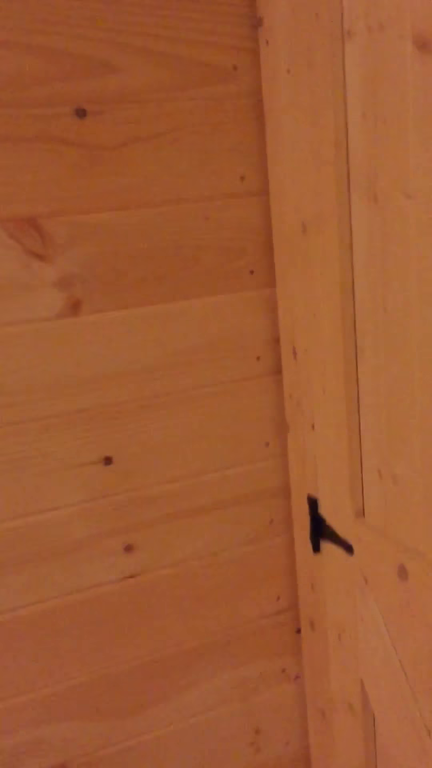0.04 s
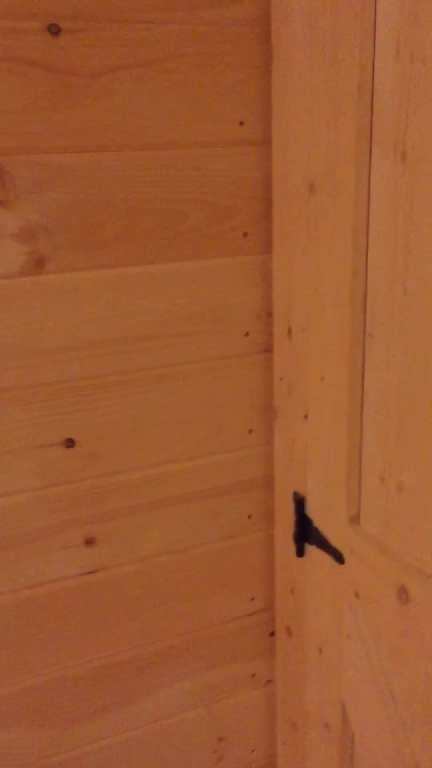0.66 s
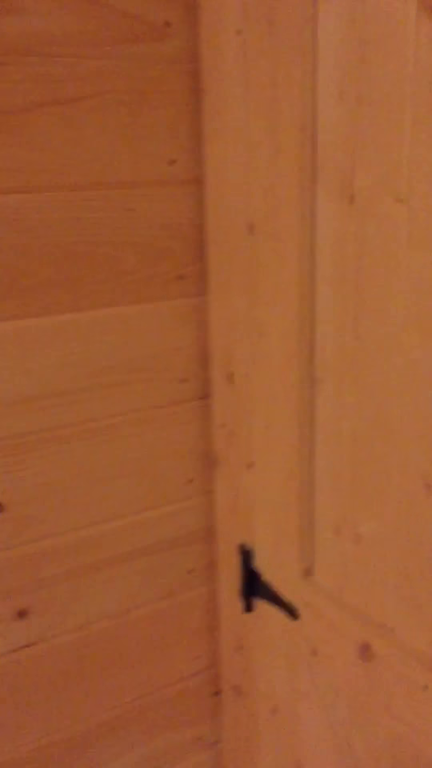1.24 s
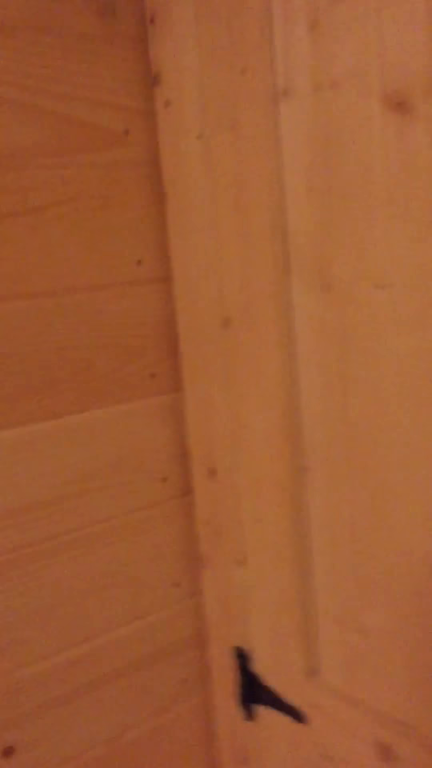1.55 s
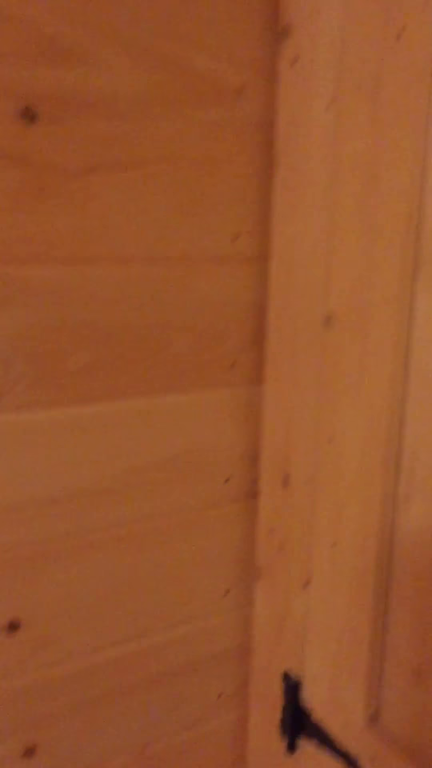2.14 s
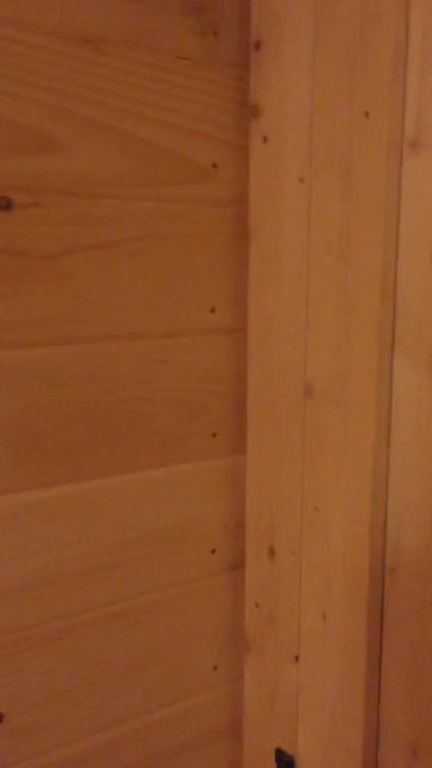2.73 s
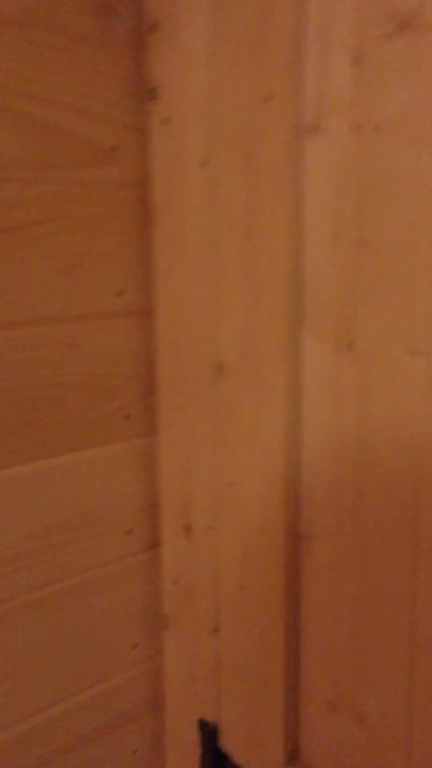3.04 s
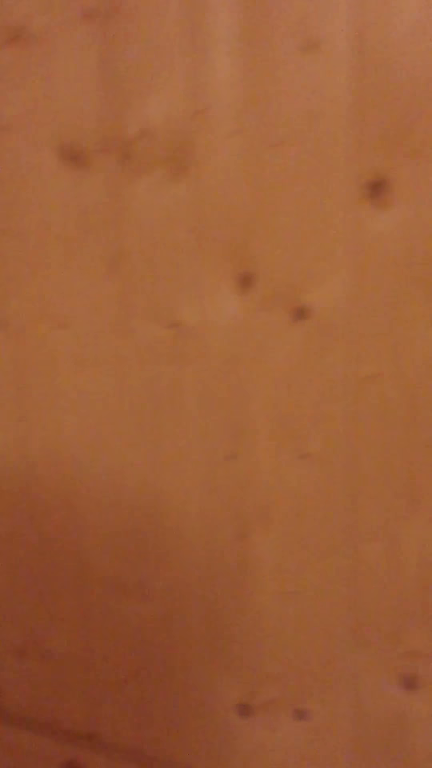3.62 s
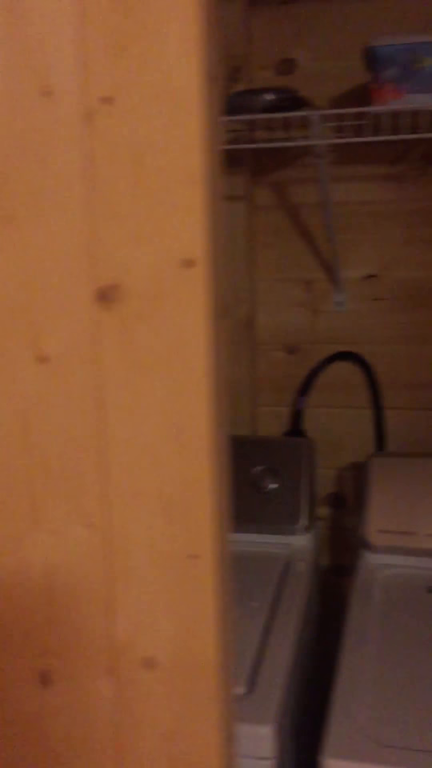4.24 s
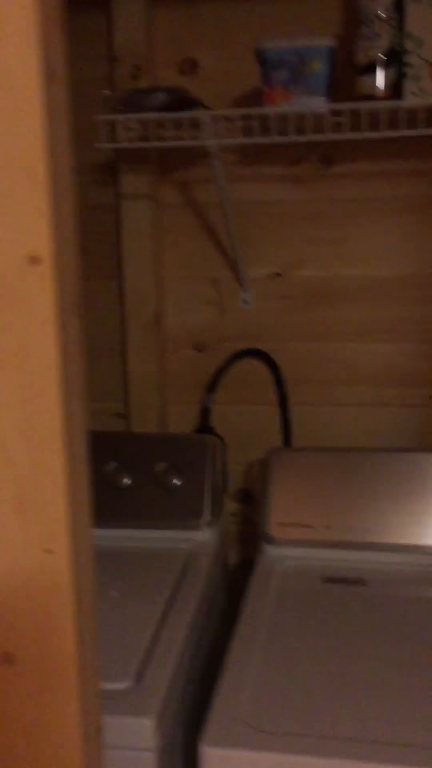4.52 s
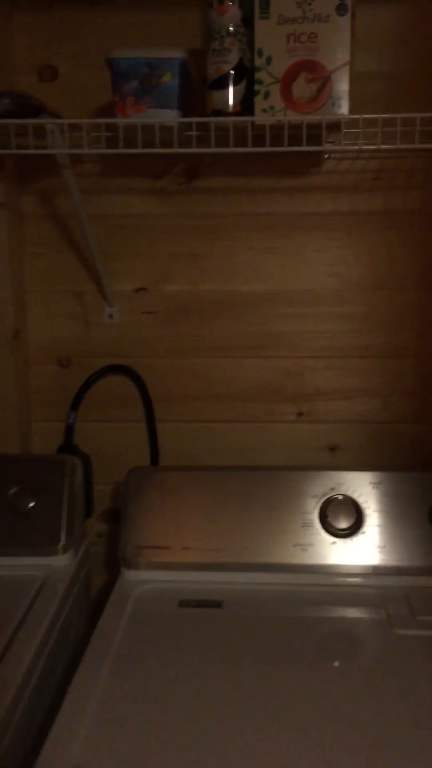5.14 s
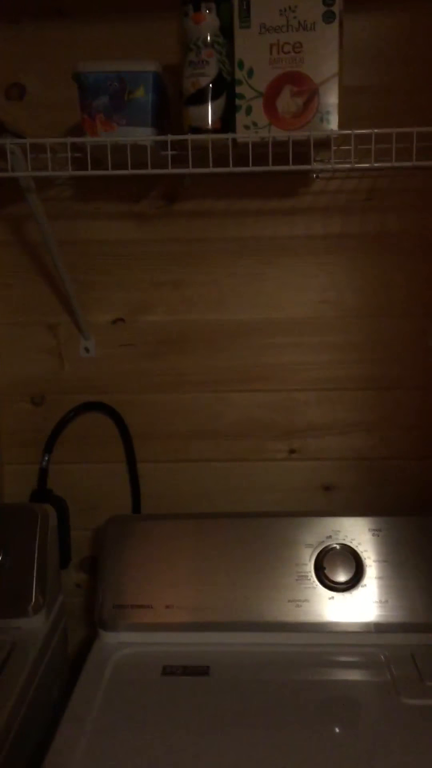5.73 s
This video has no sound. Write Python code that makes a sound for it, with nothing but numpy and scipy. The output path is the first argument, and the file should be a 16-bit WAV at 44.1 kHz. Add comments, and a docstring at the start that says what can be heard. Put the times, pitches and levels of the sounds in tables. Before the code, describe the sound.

A few soft bumps and a hand brushing boards lead into a run of uneven, hollow knocks as wooden closet doors stick and slip in their frame. Fittings click and a pivot squeaks faintly. One door breaks free with a sharp bang, and more booming knocks follow and fade. After a pause, the door comes to rest with a dull thud. It is heard close up in a small, quiet wooden cabin.

```python
"""A few soft bumps and a hand brushing the boards, then pine closet doors knock and boom as they are
pulled open in a small wooden cabin. The leaves stick and slip in their frame: each slip knocks the panel
and sets the closet booming, and one door breaks free with a sharp bang. Fittings tick, edges rub and a
pivot squeaks faintly, until the open door comes to rest with a dull thud over quiet room tone."""
import sys
import numpy as np
from scipy import signal
from scipy.fft import rfft, irfft, next_fast_len
from scipy.io import wavfile
from scipy.ndimage import map_coordinates

SR = 44100
rng = np.random.default_rng(int(sys.argv[2]) if len(sys.argv) > 2 else 0)


def int16_out(signal):
    """Quantize to a 16-bit WAV file."""
    q = np.round(np.clip(np.atleast_2d(signal).T, -1, 1) * 32767)
    wavfile.write(sys.argv[1], SR, q.astype(np.int16))


N = 254436
T = np.arange(SR) / SR  # seconds after a hit

# Door slips. Each row: start in seconds, strength in dB, boom in dB relative to the strength,
# crack in dB relative to the knock's mids.
SLIPS = [(0.9853, -30.5, -9, -14.5), (1.018, -33, -5.5, -36), (1.2613, -33, -3.5, -19.5),
         (1.4613, -24.5, -15, -10.5), (1.5626, -18.5, -8.5, -13.5), (1.6573, -25, -3, -9.5),
         (1.929, -27, -3, -8.5), (2.1815, -29.5, -2.5, -16), (2.709, -23, -1, -11.5),
         (2.9725, -23, -4.5, -9.5), (3.222, -25, -3.5, -9.5), (3.4311, -35, -7, -20),
         (3.6169, -28, -4, -17.5), (3.6511, -34.5, -5.5, -17), (3.8053, -31.5, -3, -14),
         (3.9597, -44, -5.5, -36)]
# The leaf swinging out of its frame. Each row: time in seconds, how free it is from 0 to 1.
SWING = [(3.1, 0), (3.65, 0.99)]
# The bang's three quick contacts. Each row: start in seconds, level in dB, treble shelf in dB.
BANG_HITS = [(2.5146, -14, -4), (2.518, -18.5, 8.5), (2.521, -20, -13)]
# The door meeting its stop. Each row: start in seconds, level in dB, puff in dB relative to the level.
STOP_HITS = [(5.2076, -32, -6.5), (5.226, -33.5, -4.5)]
# Soft, heavy bumps. Each row: start in seconds, level in dB, pitch the struck spot favours in Hz.
BUMPS = [(0.042, -51, 155), (0.057, -48.5, 111), (0.399, -56, 60), (0.902, -44.5, 116), (0.953, -44, 60),
         (1.584, -32.5, 162), (2.438, -41.5, 246), (2.483, -31.5, 160), (5.089, -53.5, 200),
         (5.378, -50.5, 115)]
# Fitting clicks. Each row: start in seconds, strength in dB, crack in dB relative to the mids.
TICKS = [(0.8657, -39, -10), (0.902, -46, 2), (0.948, -57, 12), (1.3948, -50, -15), (1.4147, -43, -15),
         (1.4486, -34, -23), (1.5416, -30.5, -8), (1.5472, -38.5, 5.5), (2.0575, -50.5, -4),
         (2.359, -31, -14.5)]
# Wood sliding on wood. Each row: start and length in seconds, opening and closing level in dB,
# low shelf in dB.
RUBS = [(0.946, 0.057, -49.5, -54.5, -10), (1.391, 0.07, -55.5, -49, -17.5), (1.489, 0.096, -57, -40, 5),
        (2.364, 0.115, -56, -53, 2.5), (2.474, 0.051, -46, -24, 4)]
# Pivot squeaks. Each row: start and length in seconds, pitch in Hz, level in dB.
SQUEAKS = [(1.112, 0.021, 1020, -63), (1.176, 0.11, 1100, -66.5), (1.753, 0.03, 870, -46),
           (3.512, 0.11, 1374, -61.5), (3.741, 0.018, 1100, -63.5)]
# Strokes of hand and sleeve. Each row: start and length in seconds, level in dB.
BRUSHES = [(0.328, 0.039, -55), (0.368, 0.054, -56), (0.428, 0.12, -70)]
RUSTLES = [(5.007, 0.085, -70.5), (5.377, 0.36, -71)]

# What rings after a hit. Each row: pitch in Hz, level in dB, time to fall 60 dB in seconds.
CLOSET_MODES = [(41.3, -0.5, .75), (57.68, 3, 0.74), (70.2, -4.5, 0.34), (80.7, 0, 0.9), (87.3, 0, 0.38),
                (114, -1.5, 0.36), (124, -7, 0.28), (133.35, -6, 0.53), (159.2, -5.5, 0.34),
                (187, -3, 0.22), (249, -6.5, 0.31), (315, -14.5, 0.39)]  # the low boom of door and closet
FITTING_MODES = [(676, 2, 1.2), (1359, -0.5, 0.9)]  # a metal fitting singing on faintly
FRAME_MODES = [(87, -0.5, 0.62), (124, -1, .35), (133, 3.5, 0.27), (240, -7.5, 0.39), (338, -6.5, 0.49),
               (660, -15, 0.12), (731, -11.5, 0.33), (814, -15, 0.25), (990, -15, .18), (1044, -16, 0.11),
               (1226, -4, 0.17), (1638, -15.5, 0.37), (2280, -9, 0.1), (2509, -8.5, 0.17),
               (2300, -6.5, 0.35), (2770, -9, .25), (3800, -12.5, .18), (6450, -16.5, .15)]  # the frame under the bang
STOP_MODES = [(61, -5, 0.53), (153.7, -1, 0.21), (177, -5.5, .22), (248.4, -5, 0.27), (281, 3.5, 0.091),
              (303, -12, 0.15), (423, -17, 0.26), (508, -34, 0.15), (536, -15.5, 0.19), (738, -20.5, 0.18),
              (1595, -22.5, 0.13)]  # the door against its stop
THUD_MODES = [(63, 0, 0.23), (118.97, -5, 0.095), (152.7, -5.5, 0.16), (168, -3, .16), (204, -9.5, 0.3),
              (245.5, -11.5, .22), (300, -6.5, .18), (493, -23.5, 0.18), (552, -19, 0.067),
              (1760, -29, .15)]  # woodwork under a soft bump

# Resonances of the door panel, its track and the brushed boards.
# Each row: centre in Hz, width in Hz, peak level in dB.
PANEL_PEAKS = [(394, 75, -2.5), (577.5, 26, 1), (708, 32, 0.5), (850, 39, 1), (1100, 50, 0.5),
               (1610, 78, -4), (2820, 28, 3), (3385, 20, 1.5), (3780, 43, -4), (4240, 30, -3),
               (4530, 160, 1.5), (5720, 31, -4), (7300, 85, 1)]
TRACK_PEAKS = [(1820, 58, -3), (2045, 230, -2.5), (2365, 60, 1), (5700, 180, -0.5), (7610, 260, -4.5)]
BOARD_PEAKS = [(2280, 60, 8), (2940, 160, 13), (3840, 170, 6), (4700, 170, -1), (6970, 360, 5),
               (7400, 120, 6), (9600, 140, 5), (15065, 800, 0)]

# The tone of each source's noise, as an EQ curve. Each row: frequency in Hz, gain in dB.
KNOCK_EQ = [(88, -36.5), (150, -6), (328, -7.5), (484, -16), (837, -18), (1060, -21.5), (1120, -22.5),
            (1530, -22), (2270, -19.5), (2810, -21.5), (6770, -39), (7470, -36), (10400, -53.5),
            (14500, -49.5), (16000, -67.5)]
BANG_EQ = [(60, -16.5), (100, 3), (190, -16.5), (250, -11.5), (580, -11.5), (740, -6.5), (1250, -11),
           (1550, -16), (2050, -11.5), (2650, -5.5), (4800, -20), (5900, -17.5), (7200, -25),
           (12000, -23.5), (16000, -32.5)]
PUFF_EQ = [(35, -51.5), (60, -4), (168, -10.5), (226, -13.5), (290, -2.5), (355, -13.5), (517, -13),
           (826, -34.5), (1620, -40.5), (2500, -54.5), (3250, -101), (5500, -120)]
RUB_EQ = [(120, -23.5), (200, -6.5), (612, -18), (1500, -14), (1910, -12.5), (2210, -21), (2380, -10.5),
          (2750, -24.5), (6170, -26.5), (16000, -40.5)]
BRUSH_EQ = [(400, -1.5), (1000, -9), (2000, -6), (3500, -12), (6000, -5), (9000, -12.5), (16000, -10.5)]
RUSTLE_EQ = [(300, -6.5), (1200, -1), (2500, 2), (5000, -3), (9000, -13), (16000, -16)]
ROOM_TONE_EQ = [(15, -55.5), (25, -26), (49, -8), (70, -1.5), (145, -16.5), (200, -11), (242, -18.5),
                (335, -20.5), (516, -23.5), (1230, -25), (1370, -26), (2480, -25.5), (16000, -39)]

# The cabin's reverb. Each row: frequency in Hz, time to fall 60 dB in seconds.
CABIN_DECAY = [(150, 0.34), (420, 0.25), (1100, .3), (2900, .25), (7000, 0.24), (14000, 0.098)]

MEDIUM_SLIP_DB, MEDIUM_BUMP_DB = -27, -45.5  # hits harder than these sound woodier
ATTACK_SAMPLES = SR // 50  # hits are levelled over their first 20 ms


def door_slips():
    """Each slip knocks the panel, booms the closet and rings a fitting; the leaf then falls softly back."""
    out = np.zeros(N)
    same_spot = contact(t60=.018, room_db=-1.5, attack=.001)  # shared by every slip
    for start, db, boom_db, crack_db in SLIPS:
        blow = same_spot + .7 * contact(t60=.018, room_db=-1.5, attack=.001)
        force_db = db - MEDIUM_SLIP_DB
        free = np.interp(start, *np.transpose(SWING))
        # Hard slips sound woody; light slips and a free leaf bring out the track.
        wood_db = 1.9 + .15 * force_db - 5.5 * free
        track_db = .89 - 1.4 * force_db + 5 * free
        rebound_db = db - 17 + 10 * free
        add(out, start, amp(db - 12) * panel(blow, wood_db, crack_db, track_db))
        add(out, start, amp(db + boom_db) * ringing(CLOSET_MODES, attack=.024, scatter_db=.5))
        add(out, start, amp(db - 45) * ringing(FITTING_MODES, attack=.0082, scatter_db=1))
        add(out, start + .02, thud(rebound_db, spot_hz=172))
    return out


def panel(blow, wood_db, crack_db, track_db):
    """A blow heard through the door: hollow wood below, panel and track ringing, the crack on top."""
    def door_gain(hz):
        body = amp(along(KNOCK_EQ, hz)) * resonant(PANEL_PEAKS, hz, lift_db=3)
        return body * resonant(TRACK_PEAKS, hz, lift_db=track_db)

    def bands(hz):
        """Power shares of wood, mids and crack."""
        below_mids, below_crack = lowpass(hz, 1350) ** 2, lowpass(hz, 4600) ** 2
        return np.array([below_mids, below_crack - below_mids, 1 - below_crack])

    knock = coloured(blow, door_gain)
    # Balance the three bands over the attack, with the mids at 0 dB.
    attack_power = 2 * abs(rfft(knock[:ATTACK_SAMPLES]) / ATTACK_SAMPLES) ** 2
    band_power = bands(np.fft.rfftfreq(ATTACK_SAMPLES, 1 / SR)) @ attack_power
    power_gain = amp([wood_db, 0, crack_db]) ** 2 / band_power
    return coloured(knock, lambda hz: np.sqrt(abs(power_gain @ bands(hz))))


def door_bang():
    """The door breaks free in a hard, bright rattle of contacts; fitting and frame ring on."""
    out = np.zeros(N)
    for start, db, treble_db in BANG_HITS:
        crack = eq(contact(t60=.012, room_db=-4, attack=.0003), BANG_EQ)
        crack = eq(crack, [(2500, 0), (9000, treble_db)])
        add(out, start, amp(db) * unit_attack(crack))
    first_hit = BANG_HITS[0][0]
    add(out, first_hit, amp(-48.5) * ringing(FITTING_MODES, attack=.005, scatter_db=1))
    add(out, first_hit, amp(-24) * ringing(FRAME_MODES, attack=.0022, scatter_db=1.5))
    return out


def door_stop():
    """The open door settles against its stop with a dull double thud."""
    out = np.zeros(N)
    for start, db, puff_db in STOP_HITS:
        puff = unit_attack(eq(contact(t60=.089, room_db=-3), PUFF_EQ))
        ring = ringing(STOP_MODES, attack=.0057, scatter_db=1.5)
        add(out, start, amp(db) * (amp(puff_db) * puff + ring))
    return out


def woodwork_bumps():
    """Hand and door bump softly against the woodwork."""
    out = np.zeros(N)
    for start, db, spot_hz in BUMPS:
        add(out, start, thud(db, spot_hz))
    return out


def thud(db, spot_hz):
    """A soft hit rings the low modes, most of all near spot_hz; harder hits add more woody puff."""
    puff = unit_attack(eq(contact(t60=.12, room_db=-6), PUFF_EQ))
    puff_db = -12.5 + .8 * (db - MEDIUM_BUMP_DB)
    modes = []
    for hz, mode_db, t60 in THUD_MODES:
        octaves_off = np.log2(hz / spot_hz)
        modes.append((hz, mode_db + 9 * np.exp(-(octaves_off / .2) ** 2), t60))
    return amp(db) * (amp(puff_db) * puff + ringing(modes, attack=.003, scatter_db=2.5))


def fitting_ticks():
    """Light clicks of the fittings, too weak to move the whole door, so thin in the bass."""
    out = np.zeros(N)
    for start, db, crack_db in TICKS:
        blow = eq(contact(t60=.0074, room_db=-1.5), [(250, -17), (900, -1.5)])
        add(out, start, amp(db - 16) * panel(blow, wood_db=0, crack_db=crack_db, track_db=-6))
    return out


def edge_rubs():
    """The door's edge scrapes wood on wood, each short stroke swelling or easing off."""
    out = np.zeros(N)
    for start, length, opening_db, closing_db, body_db in RUBS:
        scrape = eq(friction(length, rough_db=2), RUB_EQ)
        scrape = unit(eq(scrape, [(500, body_db), (3000, 0)]))
        add(out, start, scrape * amp(np.linspace(opening_db, closing_db, len(scrape))))
    return in_cabin(out, room_db=-4.5)


def pivot_squeaks(width_hz=470, swell_db_per_s=86):
    """Friction at the pivot sings in one resonance and swells as the load builds."""
    out = np.zeros(N)
    for start, length, pitch_hz, db in SQUEAKS:
        stroke = friction(length, rough_db=6)
        squeak = coloured(stroke, lambda hz: lowpass(hz - pitch_hz, width_hz / 2, order=2))
        swell = amp(swell_db_per_s * T[:len(squeak)])
        add(out, start, amp(db) * unit(squeak * swell) * signal.windows.tukey(len(squeak), .3))
    return in_cabin(out, room_db=-2.5)


def hand_and_sleeve():
    """A hand brushes the boards and wakes their bright resonances; later its sleeve rustles faintly."""
    def board_gain(hz):
        return amp(along(BRUSH_EQ, hz)) * resonant(BOARD_PEAKS, hz, lift_db=7.5)

    out = np.zeros(N)
    for start, length, db in BRUSHES:
        add(out, start, amp(db) * unit(coloured(friction(length, rough_db=4), board_gain)))
    for start, length, db in RUSTLES:
        add(out, start, amp(db) * unit(eq(friction(length, rough_db=5.5), RUSTLE_EQ)))
    return in_cabin(out, room_db=-2)


def cabin_tail():
    """A fresh reverb tail off the plank walls, at unit energy; the top end dies first."""
    hz, t, noise = signal.stft(rng.standard_normal(SR), SR, nperseg=256)
    decay = fade(t, along(CABIN_DECAY, hz)[:, None])
    tail = signal.istft(noise * decay, SR, nperseg=256)[1][:SR]
    tail *= 1 - np.exp(-T / .0019)
    return tail / np.linalg.norm(tail)


def in_cabin(x, room_db):
    """Blend a sound with the cabin's reverb at about the same loudness."""
    wet = signal.fftconvolve(x, cabin_tail())[:N]
    return (x + amp(room_db) * wet) / np.hypot(1, amp(room_db))


def room_tone():
    """The quiet room's bed of rumble and hiss."""
    return amp(-65.5) * unit(eq(rng.standard_normal(N), ROOM_TONE_EQ))


def contact(t60, room_db, attack=.000078):
    """A brief crack of wood and the cabin's answer; times in seconds."""
    crack = rng.standard_normal(SR) * fade(T, t60) * (1 - np.exp(-T / attack))
    return crack / np.linalg.norm(crack) + amp(room_db) * cabin_tail()


def ringing(modes, attack, scatter_db):
    """Damped modes of alternating polarity, each at a slightly new level on every hit."""
    ring = np.zeros(SR)
    for k, (hz, db, t60) in enumerate(modes):
        gain = (-1) ** k * amp(db + scatter_db * rng.normal())
        ring += gain * fade(T, t60) * np.sin(2 * np.pi * hz * T)
    return unit_attack(ring) * (1 - np.exp(-T / attack))


def friction(length, rough_db, grains_per_s=500):
    """One sliding stroke: grainy noise with softened ends."""
    n = max(round(length * SR), SR // 200)
    grain = map_coordinates(rng.standard_normal(SR // 20), [np.arange(n) * grains_per_s / SR], order=1)
    stroke = rng.standard_normal(SR)[:n] * amp(rough_db * grain)
    return unit(stroke) * signal.windows.tukey(n, .12)


def coloured(x, gain):
    """Filter by gain(hz) at minimum phase, so nothing rings ahead of a hit."""
    size = next_fast_len(len(x) + SR // 8, True) * 2
    response = np.maximum(gain(np.fft.rfftfreq(size, 1 / SR)), 1e-6)
    cepstrum = irfft(np.log(response))
    cepstrum[1:size // 2] *= 2
    cepstrum[size // 2 + 1:] = 0
    return irfft(rfft(x, size) * np.exp(rfft(cepstrum)))[:len(x)]


def eq(x, curve):
    """Shape a sound with a curve of (Hz, dB) points."""
    return coloured(x, lambda hz: amp(along(curve, hz)))


def resonant(peaks, hz, lift_db):
    """Gain of resonant peaks standing on a flat base."""
    powers = (amp(db + lift_db) ** 2 / (1 + (2 * (hz - centre) / width) ** 2)
              for centre, width, db in peaks)
    return np.sqrt(1 + sum(powers))


def lowpass(hz, edge_hz, order=4):
    """Gain of a smooth low-pass."""
    return 1 / np.sqrt(1 + (hz / edge_hz) ** (2 * order))


def along(points, hz):
    """Read (Hz, value) points on a log frequency axis."""
    point_hz, values = np.transpose(points)
    return np.interp(np.log(hz + 1), np.log(point_hz + 1), values)


def fade(t, t60):
    """Fall by 60 dB in t60 seconds."""
    return np.exp(-np.log(1000) * t / t60)


def amp(db):
    """Decibels to gain."""
    return 10 ** (np.asarray(db) / 20)


def unit(x):
    """Level a sound to rms 1."""
    return x / np.sqrt(np.mean(x ** 2) + 1e-20)


def unit_attack(x):
    """Level a hit to rms 1 over its attack."""
    return x / np.sqrt(np.mean(x[:ATTACK_SAMPLES] ** 2) + 1e-20)


def add(out, start, x):
    """Mix a sound in at start seconds."""
    first = round(start * SR)
    out[first:first + len(x)] += x[:N - first]


def scene():
    """The mono mix, heard close to the door."""
    hits = door_slips() + fitting_ticks() + door_bang() + woodwork_bumps() + door_stop()
    strokes = edge_rubs() + hand_and_sleeve() + pivot_squeaks()
    return (hits + strokes + room_tone())[None]


def record(dry, low_cut_hz=30, top_hz=16000, ceiling=.93):
    """The microphone sheds deep bass, rounds off peaks near full scale and loses the very top."""
    x = signal.sosfilt(signal.butter(3, low_cut_hz, "high", fs=SR, output="sos"), dry)
    x = x / (1 + np.abs(x / ceiling) ** 6) ** (1 / 6)
    size = next_fast_len(N + SR // 4)
    in_band = np.fft.rfftfreq(size, 1 / SR) < top_hz
    return irfft(rfft(x, size) * in_band, size)[..., :N]


dry = scene()
out = record(dry)
int16_out(out)
```